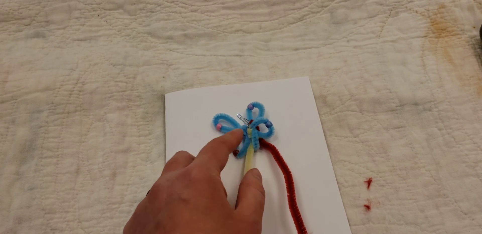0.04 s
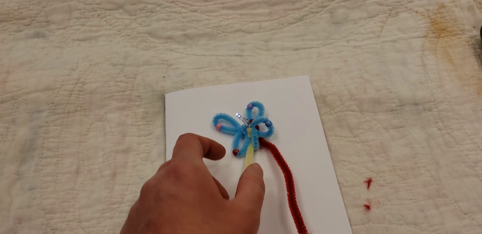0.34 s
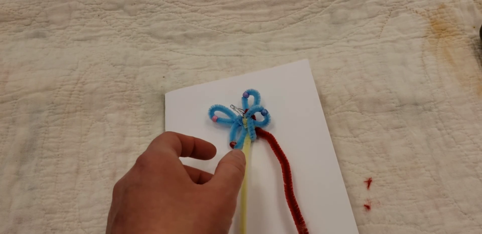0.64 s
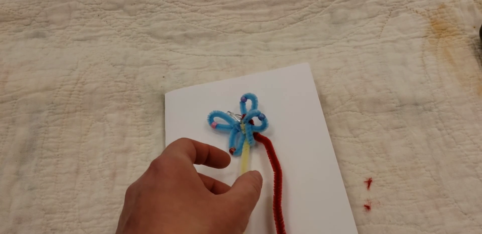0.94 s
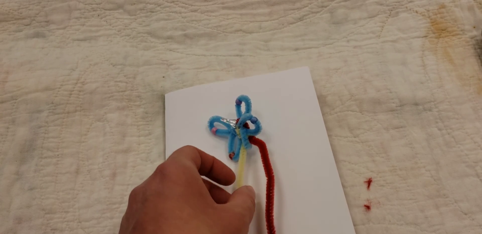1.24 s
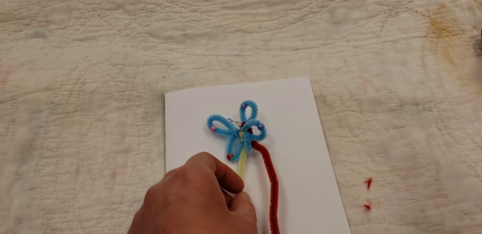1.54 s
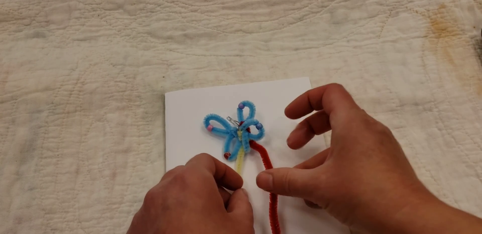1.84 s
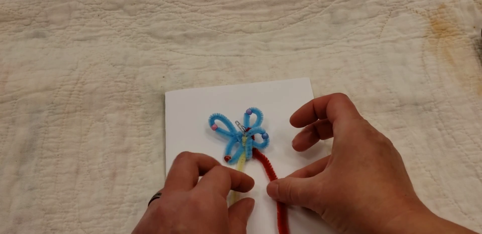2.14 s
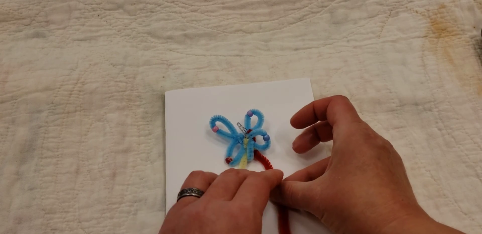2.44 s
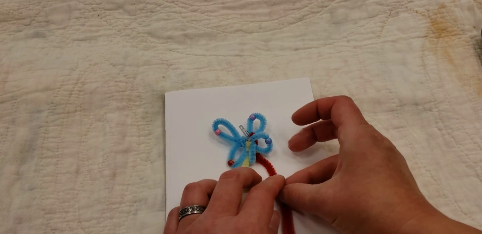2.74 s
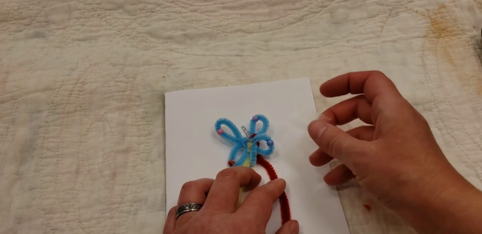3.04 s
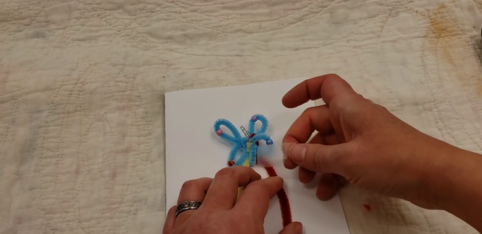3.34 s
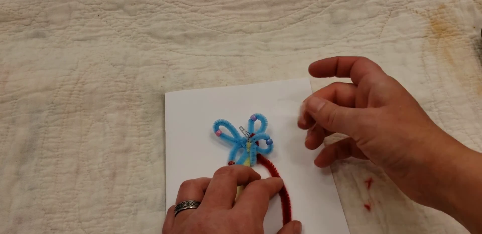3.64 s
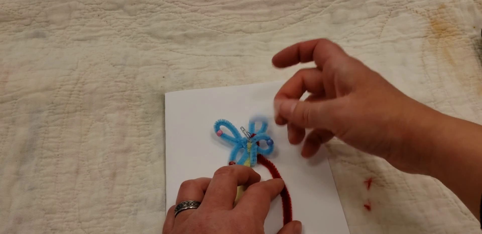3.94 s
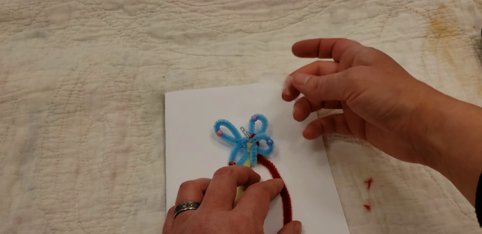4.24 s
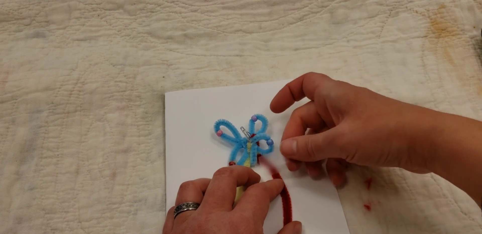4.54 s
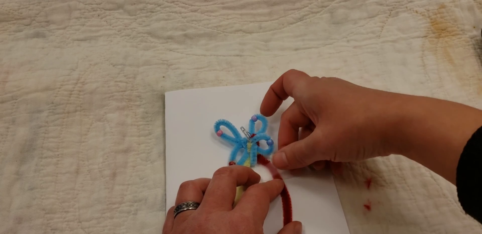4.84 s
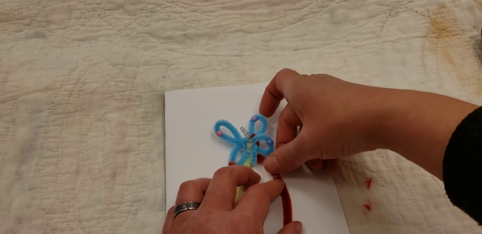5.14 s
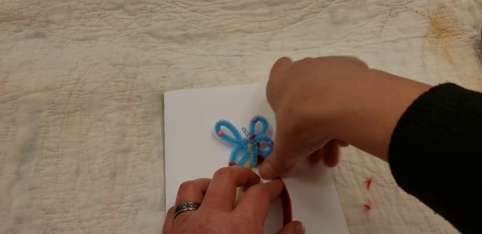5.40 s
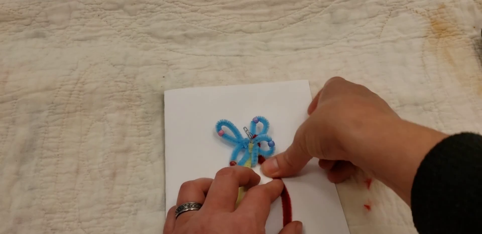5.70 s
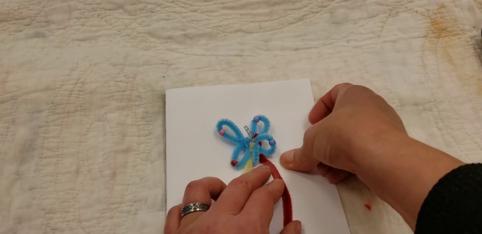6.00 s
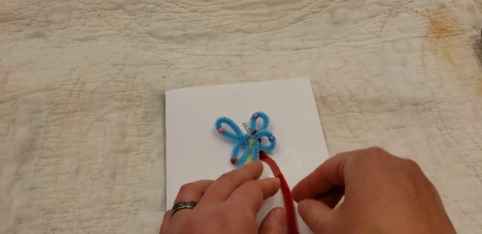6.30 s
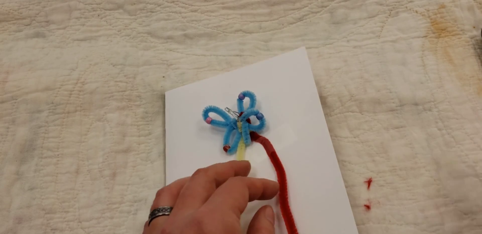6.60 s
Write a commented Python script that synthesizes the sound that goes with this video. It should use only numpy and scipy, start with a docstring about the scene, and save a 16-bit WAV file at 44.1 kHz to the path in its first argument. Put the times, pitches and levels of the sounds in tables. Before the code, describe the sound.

Fingers softly rustle pipe cleaners on a paper card, with one loud snap of card and a few wire clicks over a low room hum.

```python
"""In a small humming room, hands arrange pipe cleaners on a folded paper card on a cloth-covered table.
Stick-slip friction makes fingers rub and bristles rustle; a wire drags, catches and lets go with a click.
Once the card buckles with a loud snap, and its modes ring on.
The listener is close, a little to the left of the work."""
import sys
import numpy as np
from scipy import signal
from scipy.fft import rfft, irfft
from scipy.io import wavfile

SR = 44100
rng = np.random.default_rng(int(sys.argv[2]) if len(sys.argv) > 2 else 0)


def store_pcm(level_fs):
    """Save levels as 16-bit WAV."""
    pcm = np.round(np.clip(level_fs, -1, 1) * 32767).astype(np.int16)
    wavfile.write(sys.argv[1], SR, np.atleast_2d(pcm).T)


N = 293706
TIME = np.arange(N) / SR

# Spectrum of a contact muffled by cloth. Each row: frequency in Hz, relative level in dB.
MUFFLED_SPECTRUM = [(60, -7.5), (170, -8.5), (300, -3), (500, 5), (700, -4), (1000, -13), (1500, -22),
                    (5000, -32), (16000, -56.5)]


def amp(db):
    """Decibels to amplitude ratio."""
    return 10 ** (np.asarray(db) / 20)


def unit(x):
    """Normalisation to an rms of 1."""
    return x / np.sqrt(np.mean(x ** 2) + 1e-30)


def read(points, hz):
    """Interpolation of a table on a log-frequency axis."""
    freqs, values = np.transpose(points)
    return np.interp(np.log(hz + 1), np.log(freqs + 1), values)


def add(mix, start_s, sound):
    """Superposition of a sound on the mix."""
    part = mix[round(start_s * SR):][:len(sound)]
    part += sound[:len(part)]


def colour(x, spectrum, pitch=1):
    """Minimum-phase filtering by a spectrum, shifted by a pitch factor."""
    size = 4096
    hz = abs(np.fft.fftfreq(size, 1 / SR))
    log_gain = np.log(amp(read(spectrum, hz / pitch)))
    response = np.exp(np.conj(signal.hilbert(log_gain)))
    taps = np.fft.ifft(response).real[:size // 2]
    return signal.fftconvolve(x, taps)[:len(x)]


def resonate(x, hz, width_hz):
    """A single damped resonance."""
    r = np.exp(-np.pi * width_hz / SR)
    return 2 * signal.lfilter([1 - r], [1, -r * np.exp(2j * np.pi * hz / SR)], x).real


def noise_band(hz, width_hz):
    """Narrow-band noise from two equal resonances in series."""
    once = resonate(rng.standard_normal(N), hz, width_hz)
    return unit(resonate(once, hz, width_hz))


def noise_pair(spectrum, coherence, left_db):
    """Partly coherent noise at two microphones; left_db is left minus right."""
    left, other = (unit(colour(rng.standard_normal(N), spectrum)) for _ in range(2))
    right = coherence * left + np.sqrt(1 - coherence ** 2) * other
    return np.array([amp(left_db / 2) * left, amp(-left_db / 2) * right])


def wander(rate_hz):
    """Slow random motion: low-pass noise with an rms of 1."""
    hz = np.fft.rfftfreq(N, 1 / SR)
    return unit(irfft(rfft(rng.standard_normal(N)) * np.exp(-(hz / rate_hz) ** 2), N))


def held(spans, fade_s=.015):
    """Envelope of slow movements that fade in, hold and fade out."""
    return sum(amp(db) * (1 + np.tanh((TIME - start) / fade_s)) * (1 + np.tanh((end - TIME) / fade_s)) / 4
               for start, end, db in spans)


def burst(decay_ms, size=6000):
    """Impulsive excitation: noise with an exponential decay."""
    return rng.choice([-1, 1], size) * np.exp(-np.arange(size) / SR * 1000 / decay_ms)


def with_energy(x, db):
    """Gives a transient the energy of one millisecond at this rms level."""
    return amp(db) * x * np.sqrt(SR / 1000 / np.sum(x ** 2))


def slips(per_s, spread_db):
    """Stick-slip friction: a random train of tiny impulses of uneven size."""
    sizes = amp(spread_db * np.minimum(rng.exponential(1, N), 4))
    return sizes * rng.choice([-1, 1], N) * (rng.random(N) < per_s / SR)


def background():
    """Ventilation gives broadband rumble and a randomly modulated hum; microphone self-noise adds hiss."""
    # Each row: frequency in Hz, relative spectral density in dB.
    rumble_spectrum = [(15, -10.5), (25, -10), (40, -11), (60, -5), (80, -5.5), (105, -6), (135, -14.5),
                       (175, -9.5), (200, -15.5), (230, -15), (300, -25), (400, -39), (600, -50),
                       (2000, -81)]
    hiss_spectrum = [(100, -5), (350, 13.5), (600, 5), (1000, 1), (2000, 0.5), (3000, -2.5), (5500, -5),
                     (7200, -6.5), (9000, -1.5), (12000, -1.5), (16000, -1.5)]
    # Swells of the hum. Each row: peak time in seconds, half length in seconds, gain in dB.
    swells = [(0.508, 0.072, 11), (0.953, .12, 5.5), (4.101, 0.21, 11)]
    hum_hz = 75.9 + 6 * unit(resonate(rng.standard_normal(N), 0, width_hz=9))
    swell_db = sum(db * np.exp(-((TIME - peak) / half) ** 2) for peak, half, db in swells)
    waver_db = 3 * wander(rate_hz=6)
    tone = np.sqrt(2) * np.sin(2 * np.pi * np.cumsum(hum_hz) / SR)
    hum = amp([[-62], [-60]]) * tone * amp(swell_db + waver_db)
    rumble = amp(-59) * noise_pair(rumble_spectrum, coherence=0.9, left_db=-4)
    hiss = amp(-78) * noise_pair(hiss_spectrum, coherence=0.1, left_db=-2.5)
    hiss[1] += amp(-84.5) * noise_band(7250, width_hz=1500)  # on the right only
    return hum + rumble + hiss


def room(x, gap_s, build_s):
    """Reverberation: dense reflections build up and decay, the treble first."""
    # Each row: frequency in Hz, time to decay by 60 dB in seconds.
    decay_times = [(200, 0.55), (1000, 0.41), (2500, 0.32), (5000, .25), (8000, .23), (15000, 0.22)]
    hz, t, spectra = signal.stft(rng.standard_normal((2, SR // 2)), SR, nperseg=256)
    decay = amp(-60 * t / read(decay_times, hz)[:, None])
    tail = signal.istft(spectra * decay, SR, nperseg=256)[1]
    age = np.maximum(np.arange(tail.shape[1]) / SR - gap_s, 0)
    tail *= 1 - np.exp(-age / build_s)
    return signal.fftconvolve(x[None], tail / np.linalg.norm(tail[0]), axes=1)[:, :N]


def direct(x):
    """Time and level differences: the direct sound reaches the right microphone first and louder."""
    # Each row: frequency in Hz, left minus right level in dB.
    balance = [(100, -1.5), (1000, -8.5), (3000, -6.5), (6000, -10), (14000, -11.5)]
    # Where the work lies. Each row: start and end in seconds, left lag in ms, share of the balance.
    places = [(0, 1.6, .32, 1), (1.6, 7, .1, 0.6)]
    out = np.zeros((2, N))
    for start, end, lag_ms, share in places:
        early = x * (TIME >= start) * (TIME < end)
        late = np.interp(TIME - lag_ms / 1000, TIME, early)
        out[0] += colour(late, [(hz, share * db / 2) for hz, db in balance])
        out[1] += colour(early, [(hz, -share * db / 2) for hz, db in balance])
    return out


def fibres_and_sleeve():
    """Sliding friction: fine fibres whistle faintly, and a sleeve shuffles as the arm reaches in."""
    # Each row: start and end in seconds, relative level in dB.
    whistles = [(-.05, .14, -72.5), (4.77, 5.14, -74)]
    shuffles = [(4.55, 5.12, -83)]
    whistle = noise_band(13700, width_hz=730)
    cloth = resonate(colour(slips(per_s=500, spread_db=3), MUFFLED_SPECTRUM), 528, width_hz=450)
    return whistle * held(whistles) + unit(cloth) * held(shuffles)


def card_and_bristles(rise_share=.4):
    """Resonance: the card sounds hollow under rubbing fingers, and briefly just after the wire's click.
    The bristles brush along."""
    # Each row: frequency in Hz, relative spectral density in dB.
    rub_spectrum = [(200, -9), (600, -10.5), (950, 0.5), (1300, -2), (2400, -1), (3000, -3.5), (3900, -4.5),
                    (5200, -9), (16000, -28.5)]
    bristle_spectrum = [(300, -17.5), (2000, -13.5), (3200, -4), (4000, -1), (5500, 1.5), (7300, 2),
                        (9000, -2), (12000, -6), (16000, -2)]
    # Resting fingers shift. Each row: start and end in seconds, relative level in dB.
    fidgets = [(1.95, 2.3, -78), (4.75, 5.15, -79), (5.48, 5.7, -74.5), (5.7, 6.55, -79.5)]
    # Each row: peak time and length in seconds, relative card level in dB, card resonance in Hz,
    # relative bristle level in dB.
    rustles = [(0.01, 0.37, -82.5, 1640, -69), (0.464, 0.066, -68, 1620, -86),
               (0.737, 0.099, -70, 1450, -67), (0.971, 0.038, -65, 1450, -58), (1.6, .24, -86, 1490, -78),
               (1.868, .05, -71, 1100, -67.5), (2.16, 0.11, -78.5, 1645, -81.5),
               (2.296, 0.09, -73, 1740, -68), (2.38, 0.11, -66.5, 2080, -70.5),
               (2.523, 0.047, -73, 2230, -88), (2.72, 0.084, -62.5, 1640, -69.5),
               (2.787, .04, -76, 1680, -95.5), (2.928, 0.076, -70, 1470, -66), (3.4, .45, -87, 1540, -85.5),
               (3.703, 0.028, -76, 1558, -91), (4.639, 0.16, -87.5, 1670, -74),
               (4.755, 0.046, -79, 1920, -62.5), (5.01, 0.037, -108.5, 1756, -68),
               (5.33, 0.38, -78.5, 1620, -72), (5.403, 0.058, -60.5, 1620, -72),
               (5.756, 0.033, -71.5, 1700, -65.5), (5.885, 0.074, -70.5, 1590, -64.5),
               (6.063, 0.057, -79.5, 1580, -64.5), (6.32, 0.27, -84, 1618, -84),
               (6.47, 0.042, -66.5, 1466, -70)]
    rub = colour(slips(per_s=1400, spread_db=4.5), rub_spectrum)
    rasp = amp(-11.5) * resonate(rub, 4100, width_hz=900)  # the stiff card's upper modes
    brush = unit(colour(slips(per_s=2100, spread_db=-0.5), bristle_spectrum))
    resting = amp(-10) * unit(resonate(rub, 1710, width_hz=380) + rasp) + brush
    out = resting * held(fidgets) * amp(3 * wander(rate_hz=26))
    for peak, length, card_db, hollow_hz, bristle_db in rustles:
        flank_s = length * np.where(TIME < peak, rise_share, 1 - rise_share)
        envelope = np.exp(-((TIME - peak) / flank_s) ** 2)
        hollow = resonate(rub, hollow_hz, width_hz=310)
        out += envelope * (amp(card_db) * unit(hollow + rasp) + amp(bristle_db) * brush)
    return out


def knocks(decay_ms=5.5, rise_share=0.39):
    """Damped impacts on the cloth-covered table: lower ones start more softly and last longer."""
    # Each row: start in seconds, energy in dB as rms over 1 ms, pitch factor.
    touches = [(.185, -62.5, 0.99), (.449, -54, 3), (.650, -57.5, 1.15), (.865, -51.5, 0.73),
               (.950, -53, 0.52), (1.2037, -34, 0.99), (1.850, -60, 2.6), (2.629, -62.5, 3.2),
               (5.149, -58, 0.55), (5.4237, -37.5, 0.74), (5.4252, -39, 3.2), (5.4294, -42.5, 3.6),
               (5.524, -54, 0.85), (6.547, -43, 0.6), (6.566, -47.5, 0.8)]
    out = np.zeros(N)
    for start, db, pitch in touches:
        push = burst(decay_ms / pitch ** .5)
        onset = 1 - abs(push) ** (1 / rise_share)  # rises in this share of the decay time
        add(out, start, with_energy(colour(push * onset, MUFFLED_SPECTRUM, pitch), db))
    return out


def wire_ring(scratch, ring_hz, ring_db):
    """Resonance of the free length of wire, added to its scratch; damping grows as frequency squared."""
    ring = resonate(scratch, ring_hz, width_hz=ring_hz ** 2 / 22000)
    return unit(amp(ring_db) * unit(ring) + unit(scratch))


def wire(release_s=.003, click_ms=.85):
    """Stick and slip: a pipe cleaner's wire scratches harder and harder, then lets go with a click."""
    # Each row: frequency in Hz, relative spectral density in dB.
    wire_spectrum = [(150, -17), (400, -18), (800, -25), (1600, -15.5), (3000, -16), (4200, -8),
                     (6500, -2.5), (9000, -5), (12000, -5), (16000, -1.5)]
    # Each row: release time and build-up in seconds, level at release in dB, ring in Hz.
    drags = [(.949, 0.061, -48.5, 10700), (5.205, 0.011, -56.5, 5450), (5.292, 0.003, -41.5, 6960),
             (5.335, 0.061, -60, 10500), (5.422, 0.03, -38.5, 8400)]
    # Each row: start in seconds, energy in dB as rms over 1 ms, ring in Hz.
    clicks = [(0.9123, -39.5, 11400), (0.918, -48, 12000), (.9293, -44.5, 11500), (0.9461, -28, 11500),
              (.9498, -21.5, 10300), (1.277, -45.5, 13000), (1.849, -59, 6500), (3.4886, -56.5, 7440),
              (4.742, -47.5, 4250), (5.013, -51.5, 6400), (5.024, -52.5, 6780), (5.1487, -37, 6500),
              (5.153, -31, 12500), (5.1874, -48, 8200), (5.2908, -30.5, 11000), (5.4205, -30, 14200),
              (5.4232, -23, 13200), (5.4295, -35, 4270), (5.496, -43, 4870), (6.457, -50.5, 3900),
              (6.47, -46.5, 3500)]
    scratch = colour(slips(per_s=2800, spread_db=2.5), wire_spectrum)
    out = np.zeros(N)
    for peak, build_s, db, ring_hz in drags:
        force = np.exp(-abs(TIME - peak) / np.where(TIME < peak, build_s, release_s))
        out += amp(db) * force * wire_ring(scratch, ring_hz, ring_db=-4)
    for start, db, ring_hz in clicks:
        decay_ms = click_ms / (ring_hz / 8000) ** .8
        tick = colour(burst(decay_ms), wire_spectrum)
        add(out, start, with_energy(wire_ring(tick, ring_hz, ring_db=13.5), db))
    return out


def card_snap(rise_s=.0005, fade_share=.3):
    """Buckling: a run of tiny cracks holds while the crease travels, then dies away."""
    # Each row: frequency in Hz, relative spectral density in dB.
    crack_spectrum = [(100, -25), (300, -18), (550, -5), (750, -4.5), (1050, -3), (1300, -5.5), (2400, -7),
                      (3300, -9), (4000, 4), (4600, -2), (5500, 0.5), (8000, 0.5), (12000, -2),
                      (16000, -3.5)]
    # Each row: start and length in seconds, level in dB.
    buckles = [(1.2007, 0.0035, -24), (1.208, 0.0089, -19.5), (5.4233, 0.00027, -19)]
    force = np.zeros(N)
    for start, length, db in buckles:
        age = np.maximum(TIME - start, 0)
        fade = np.exp(-np.maximum(age - length, 0) / (fade_share * length))
        force += amp(db) * (1 - np.exp(-age / rise_s)) * fade
    cracks = rng.choice([-1., 1.], N)
    return colour(cracks * force, crack_spectrum) / np.std(colour(cracks, crack_spectrum))


def card_ring(start_s=1.21, rise_s=0.0061, db=-39.5):
    """Free vibration: the card's modes swell in the snap and ring on, in another phase on each side."""
    # Each row: frequency in Hz, relative level in dB.
    modes = [(520, -7), (689, -2.5), (782, -6.5), (991, -2.5), (1039, -5.5), (1090, -5), (1135, -6.5),
             (1534, -6), (2153, -8), (3424, -4), (3915, -6), (4032, 3), (4177, 0), (4554, -5)]
    # Each row: frequency in Hz, time to decay by 60 dB in seconds.
    decay_times = [(500, .22), (1050, .35), (2000, 0.23), (4500, .22)]
    t = np.arange(SR // 2) / SR
    onset = 1 - np.exp(-t / rise_s)
    out = np.zeros((2, N))
    for hz, mode_db in modes:
        fade = amp(db + mode_db - 60 * t / read(decay_times, hz))
        phase = 2 * np.pi * (hz * t + rng.random())
        for side in out:
            add(side, start_s, fade * onset * np.sin(phase + 0.88 * rng.standard_normal()))
    return out


def scene():
    """Superposition of direct sound, reverberation, the ringing card and the background."""
    rubs = card_and_bristles() + fibres_and_sleeve()
    scratches, touches, cracks = wire(), knocks(), card_snap()
    near = direct(amp(-1) * rubs + scratches + touches + cracks)
    into_room = amp(-4.5) * rubs + amp(-9.5) * scratches + amp(-9) * touches + amp(-4) * cracks
    return near + room(into_room, gap_s=0.0018, build_s=0.0031) + card_ring() + background()


def record(dry):
    """The frequency response of the microphones, then a low-pass band limit."""
    # Each row: frequency in Hz, gain in dB.
    response = [(20, -1), (7600, 1.5), (8300, -8), (9500, -8), (11000, 0), (13000, 0.5), (16000, 0.5)]
    heard = np.array([colour(side, response) for side in dry])
    low_pass = signal.firwin(301, 16050, window=("kaiser", 8), fs=SR)
    return signal.oaconvolve(heard, low_pass[None], "same")


dry = scene()
out = record(dry)
store_pcm(out)
```